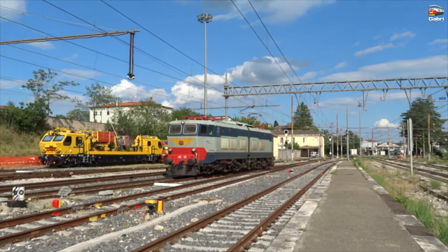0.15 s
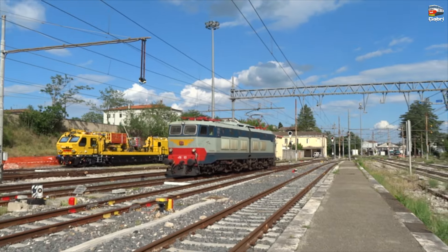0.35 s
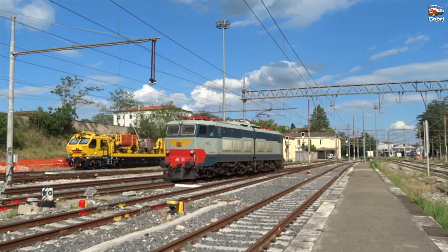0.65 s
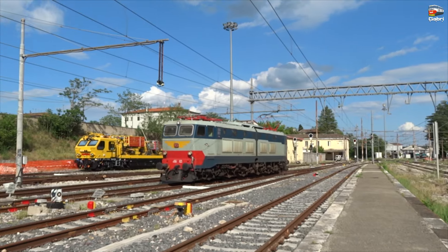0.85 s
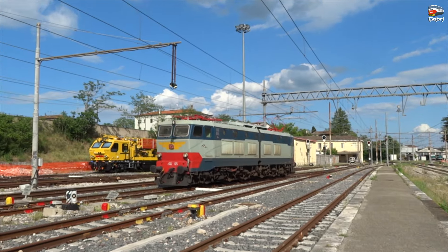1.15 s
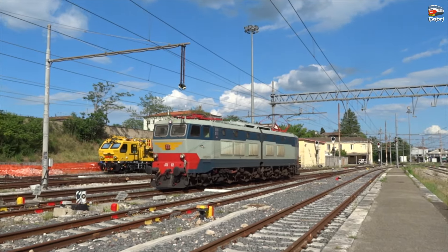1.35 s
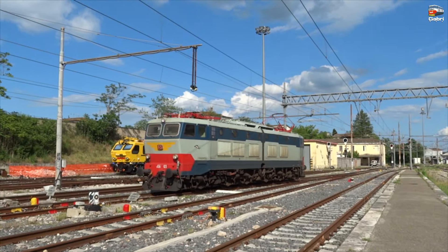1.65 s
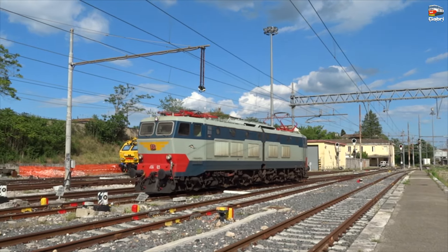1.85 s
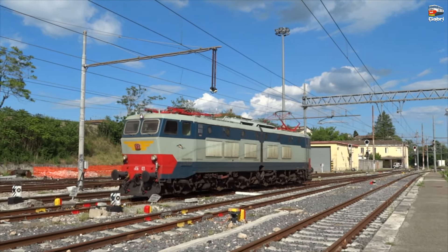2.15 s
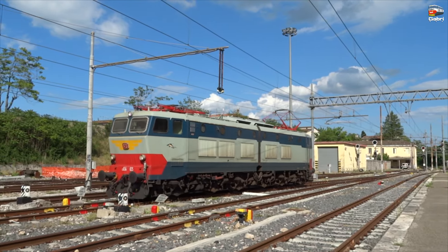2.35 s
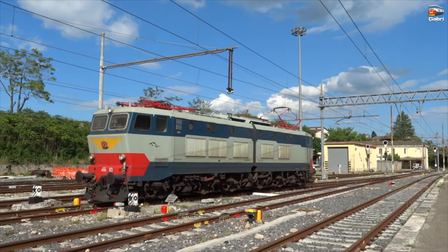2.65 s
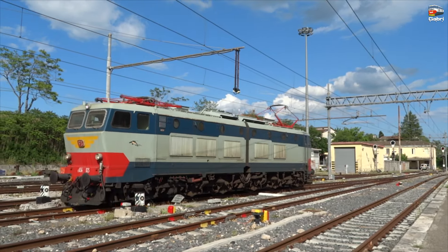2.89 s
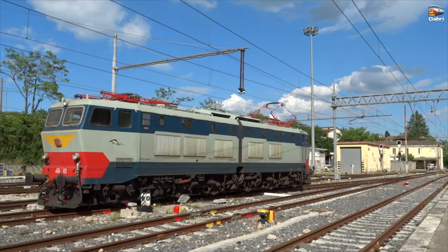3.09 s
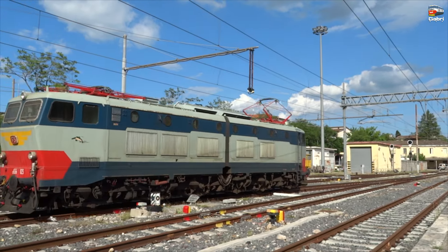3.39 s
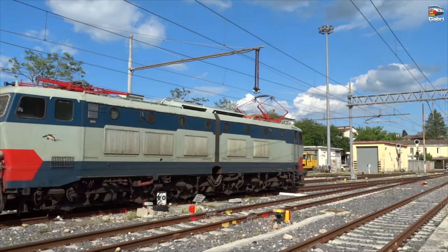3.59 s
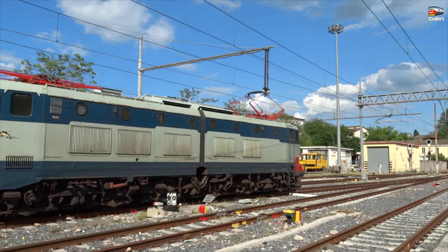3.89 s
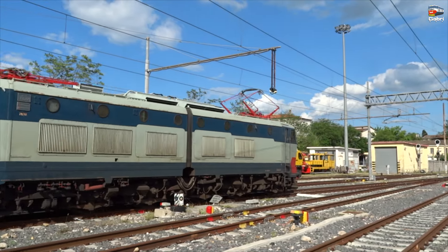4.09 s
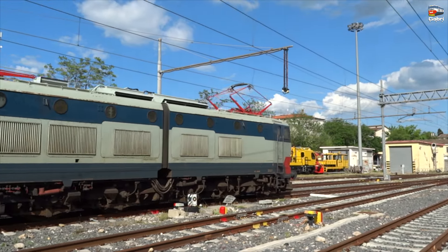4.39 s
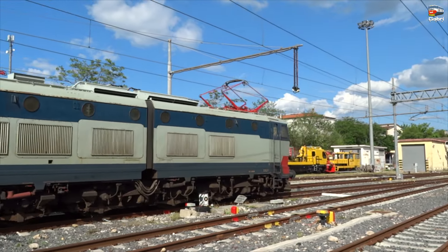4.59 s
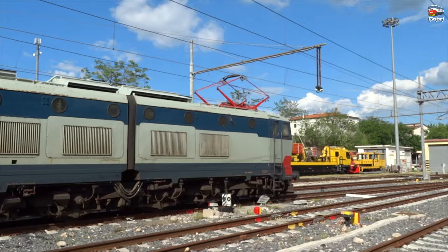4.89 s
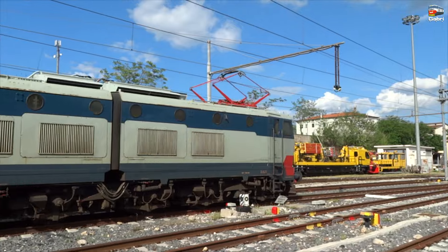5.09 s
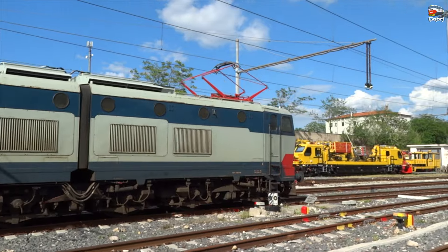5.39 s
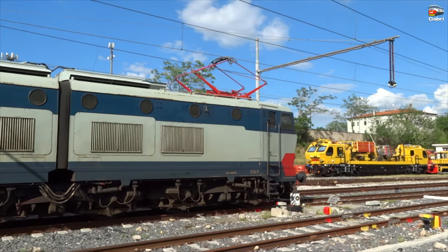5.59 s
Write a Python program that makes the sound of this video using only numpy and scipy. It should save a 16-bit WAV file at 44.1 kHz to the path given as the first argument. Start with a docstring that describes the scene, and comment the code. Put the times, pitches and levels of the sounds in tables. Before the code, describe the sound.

Dense, high metallic hiss and wavering squeals from a slow locomotive's wheels rubbing the rails, over soft rumble and irregular clacks.

```python
"""First comes a dense hiss with a few whistling notes, over a low rumble and drone.
An electric locomotive is rolling slowly through the curve of a track switch, beside a platform.
Its flanges (the lips on its wheels) rub the rail and make the steel wheels ring, squeak and chirp.
Rough rail causes the rumble, and the wheels knock over gaps. Twice the flanges briefly let go."""
import sys
import numpy as np
from scipy import signal
from scipy.fft import rfft, irfft, next_fast_len
from scipy.io import wavfile
from scipy.ndimage import uniform_filter1d, minimum_filter1d, map_coordinates

SR = 44100
rng = np.random.default_rng(int(sys.argv[2]) if len(sys.argv) > 2 else 0)


def log_audio(samples):
    """Write samples as a 16-bit WAV file to the path given in sys.argv[1]."""
    # one column per channel
    frames = np.atleast_2d(samples).T
    # limit to full scale, then quantise
    limited = np.clip(frames, -1, 1)
    pcm = np.round(limited * 32767).astype(np.int16)
    wavfile.write(sys.argv[1], SR, pcm)


N = 253134

# Short slips of the flange: time_s, length_s, change_db
FLANGE_SLIPS = [(0.172, 0.048, -3.5), (0.502, 0.025, -2), (1.45, .015, -0.5), (3.17, 0.017, -1.5),
                (3.382, 0.02, -3.5), (3.614, 0.013, -4.5), (4.272, 0.005, -12), (4.419, 0.0099, 2.5),
                (4.407, 0.0036, 0), (4.487, 0.0036, -3), (5.478, 0.018, -5)]
# How loud the rubbing is: time_s, level_db
HISS_LEVELS = [(0, -26), (.08, -22), (.3, -24), (.55, -22.5), (1.0, -21.5), (1.39, -20), (1.8, -20),
               (2.3, -21.5), (2.8, -20.5), (3.14, -20.5), (3.46, -18), (3.97, -17.5), (4.41, -18),
               (4.66, -19), (4.85, -19), (5.1, -20.5), (5.43, -21.5), (5.6, -17.5), (5.74, -21.5)]
# Colour and side of the hiss: time_s, high_part_db, low_part_db, left_over_right_db
HISS_TONE = [(0, -1, 6, 0), (.6, -2, 5, -0.5), (.8, 1.5, 4.5, 0), (1.5, -1.5, 2.5, -0.5),
             (2.3, -1, 3, -0.5), (3.1, 2, 2.5, 0), (3.3, -1.5, 0.5, 2), (3.7, -4.5, -4, 1.5),
             (4.05, -4, -4.5, 2), (4.3, -3.5, -1, 1), (4.8, 0.5, 1, 1), (5.2, -2.5, 2, 1.5),
             (5.74, 2.5, -1.5, 1.5)]
# Notes at which the far and the near wheels ring: pitch_hz, width_hz, level_db
FAR_WHEEL_NOTES = [(4370, 280, -11.5), (4850, 570, -5), (5350, 430, -5.5), (5786, 480, -3), (6580, 540, -2),
                   (7500, 1300, -3), (7900, 180, -1.5), (8440, 500, -2), (8650, 500, -22),
                   (9300, 1160, -9.5), (10490, 510, -10), (11380, 460, -14), (12250, 530, -16.5),
                   (13400, 460, -30), (14100, 800, -25), (14900, 1200, -35)]
NEAR_WHEEL_NOTES = [(4250, 500, -9), (5200, 700, -8), (5800, 600, -7), (6450, 550, -3.5), (7090, 400, -3),
                    (7790, 300, -4), (8400, 700, -5), (9150, 600, -11), (9800, 400, -12), (10450, 600, -16),
                    (11200, 600, -16), (11950, 600, -19), (12500, 500, -20), (13300, 800, -21),
                    (14300, 1000, -25), (15300, 1200, -28)]
# How much of the hiss comes from the near wheels: time_s, share_0_to_1
NEAR_SHARE = [(0, 0.34), (3.1, 0), (3.2, 0.46), (3.45, 0.4), (4.05, 0.75), (4.3, 0.65), (5.0, 0.56),
              (5.74, 0.95)]
# The four wheel notes that whistle: pitch_hz, width_hz
WHISTLE_NOTES = [(3262, 57), (4015, 160), (4745, 60), (9800, 75)]
# Loudness of the low pair of whistles, and of the high pair that sings late: time_s, lower_db, upper_db
LOW_WHISTLE_LEVELS = [(0, -30, -31.5), (.2, -34.5, -31.5), (.45, -28.5, -30), (.95, -26, -31),
                      (1.2, -30.5, -25.5), (1.55, -31.5, -29.5), (2.0, -29, -31.5), (2.7, -30.5, -31.5),
                      (3.05, -27, -30), (3.25, -42.5, -36), (3.65, -31.5, -36), (3.9, -30, -37.5),
                      (4.15, -26, -40), (4.3, -40, -33.5), (4.7, -43, -32.5), (4.9, -32, -29),
                      (5.4, -30, -30.5), (5.74, -31, -36.5)]
HIGH_WHISTLE_LEVELS = [(4.3, -60, -58), (4.42, -47, -46), (4.57, -52, -50), (4.62, -38, -50),
                       (4.7, -27.5, -49), (4.98, -26, -42), (5.08, -40, -36), (5.17, -31, -33),
                       (5.3, -40, -36), (5.45, -48, -34), (5.5, -36, -32), (5.6, -36, -50), (5.7, -31, -50),
                       (5.74, -38, -50)]
# A whistle flares up: time_s, pitch_hz, rise_db, length_s
WHISTLE_FLARES = [(0.054, 3262, 11, 0.038), (0.11, 4015, 5.5, .03), (.27, 3262, 7.5, 0.033),
                  (0.576, 3262, 7, 0.023), (.78, 3262, -1, 0.027), (.93, 3262, 2, .05),
                  (1.041, 3262, 9, 0.019), (1.15, 4015, 2, .015), (1.198, 4015, 2, .015),
                  (1.53, 3262, 8.5, 0.06), (1.86, 3262, 3.5, 0.033), (2.042, 3262, 3, 0.061),
                  (2.248, 3262, 6.5, 0.06), (2.603, 3262, 6.5, 0.023), (2.68, 3262, 6, .02),
                  (2.764, 3262, 7, .03), (2.87, 4015, 2, .04), (2.98, 3262, 7, .03),
                  (3.368, 3262, 14, 0.05), (3.683, 4015, 6, .02), (3.69, 3262, 2, 0.017),
                  (3.77, 3262, 5, .02), (3.86, 3262, 6, 0.045), (3.975, 4015, 7, .03),
                  (4.0, 3262, 5.5, 0.012), (4.25, 4015, 11, .025), (4.387, 3262, 10, .05),
                  (4.802, 3262, 8, .02), (4.843, 4015, 6.5, 0.026), (5.1, 3262, 3, .02),
                  (5.17, 3262, 7, .02), (5.19, 4015, 5, .04), (5.28, 3262, 5, 0.022),
                  (5.41, 3262, 8.5, 0.031), (5.464, 3262, 7.5, 0.013), (5.697, 4015, 8, .02)]
# Loudness of the rolling sounds: time_s, rumble_db, drone_db, rail_db, web_db, boom_db
ROLLING_LEVELS = [(0, -49.5, -41.5, -47, -31, -72), (.3, -52, -43, -45.5, -30, -74),
                  (.65, -47.5, -44, -46.5, -29.5, -63), (.75, -55, -38.5, -37.5, -26.5, -70),
                  (1.0, -49.5, -38, -41.5, -26, -68), (1.5, -49.5, -42, -41, -24.5, -66),
                  (2.0, -47.5, -36.5, -36, -26, -66), (2.45, -44.5, -32.5, -35.5, -26, -63),
                  (2.75, -44, -37.5, -36, -24.5, -58), (3.15, -46, -38, -35, -24.5, -69),
                  (3.3, -48.5, -46.5, -40, -27.5, -60), (3.55, -48.5, -43, -38, -27, -72),
                  (3.8, -44.5, -42, -43.5, -35.5, -72), (4.2, -44, -40, -38.5, -27.5, -69),
                  (4.45, -52.5, -44, -42, -28.5, -73), (4.9, -51, -40, -38.5, -25.5, -75),
                  (5.35, -49, -47, -42, -31.5, -73), (5.74, -52, -42, -40.5, -27, -79)]
# Shape of the ground's deep boom and of the rumble above it: pitch_hz, level_db
BOOM_SHAPE = [(15, -45), (25, -20), (40, -14), (86, 2), (140, -11), (180, -33), (310, -120)]
RUMBLE_SHAPE = [(82, -45), (140, -15.5), (242, 2), (404, -2.5), (453, -12), (497, 2), (544, -7),
                (600, -0.5), (780, -24), (1320, -120)]
# Notes of the drone, the rail and the web (a wheel's disc): pitch_hz, width_hz, level_db
DRONE_NOTES = [(650, 160, -13.5), (692, 135, -0.5), (815, 164, 1.5), (975, 220, -5.5)]
RAIL_NOTES = [(1122, 180, -4), (1267, 180, 3), (1420, 135, -1.5), (1673, 210, -1)]
WEB_NOTES = [(1938, 188, 0.5), (2092, 150, -1.5), (2262, 100, -1.5), (2342, 160, -1), (2517, 99, 2),
             (2703, 173, 0), (2896, 230, -3), (3170, 92, -12), (3410, 300, -1.5), (3820, 250, -6.5)]
# Lean to the left, which each sound scales by its own amount: time_s, rail_db, web_db
LEFT_LEAN = [(0.0, 2.5, -0.5), (0.65, 0.0, -1), (0.73, 4.5, 1), (1.17, -1, -1), (1.92, 3.5, 2.0),
             (4.0, 2, 4), (4.28, 0, -0.5), (4.36, 2, 4), (5.26, 2.5, 4), (5.74, -0.5, 3)]
# Wheels drop over rail gaps: start_s, ring_db, thud_db
GAP_KNOCKS = [(.092, -51, -52), (.60, -58, -48), (.70, -32, -52), (.862, -44, -59), (1.13, -40, -38.5),
              (1.722, -30, -44), (1.892, -25, -42), (1.96, -30.5, -42), (2.135, -30, -31.5),
              (2.312, -25, -32), (2.39, -26.5, -35), (2.484, -28, -46), (2.698, -24, -33),
              (2.847, -25.5, -37), (2.905, -22.5, -36), (3.015, -40, -49), (3.133, -27, -41),
              (3.177, -26, -46), (3.365, -31.5, -38), (3.613, -35, -46), (3.731, -32, -46),
              (3.876, -28, -32.5), (3.966, -32, -48), (4.06, -37, -36.5), (4.146, -37, -36),
              (4.241, -28.5, -49), (4.295, -37, -48), (4.781, -33, -42), (4.841, -39, -36),
              (4.899, -35, -58), (5.17, -42, -46), (5.26, -46, -53), (5.34, -32, -43), (5.47, -40, -41)]
# Notes of the sleepers, the beams under the rails: pitch_hz, width_hz, level_db
SLEEPER_NOTES = [(240, 71, 4), (400, 230, 3.5)]
# The flange bites the rail with a spit: start_s, strength_db
FLANGE_BITES = [(0.181, -25), (2.375, -15), (3.6361, -25), (4.127, -11), (4.155, -17), (4.1944, -14),
                (4.273, -12), (4.32, -18)]
# The flanges let go: start_s, grips_again_s, depth_db, fall_s
FLANGE_RELEASES = [(0.552, 0.692, -8.5, 0.016), (4.036, 4.12, -15, 0.062)]
# Brief chirps of single wheel notes: time_s, pitch_hz, peak_db, length_s
WHEEL_CHIRPS = [(1.28, 7870, -22, .03), (1.447, 6550, -21.5, .03), (1.785, 5420, -21, .015),
                (1.875, 5400, -23, .015), (1.985, 1960, -22, 0.018), (2.069, 1950, -20.5, 0.024),
                (2.575, 1930, -24, .012), (2.787, 1953, -22, .012), (2.875, 1874, -23, .012),
                (3.132, 1880, -24, .025), (3.2, 1870, -22, .012), (3.26, 6520, -22, 0.024),
                (3.295, 5200, -21.5, .015), (3.416, 2050, -23, 0.014), (3.487, 7100, -23, .03),
                (3.504, 1937, -23.5, 0.018), (3.543, 1725, -28, .01), (3.616, 7070, -26, 0.029),
                (3.655, 2030, -28, 0.011), (3.834, 6500, -25, .03), (3.97, 6530, -22, 0.024),
                (4.02, 8020, -14.5, 0.021), (4.226, 5811, -17, 0.0064), (4.331, 2000, -22.5, 0.0074),
                (4.38, 1790, -27, 0.0099), (4.505, 2410, -19.5, 0.0097), (4.705, 7100, -22, .025),
                (4.93, 7790, -24, .03), (5.11, 7900, -24, .04), (5.29, 6510, -26, .04),
                (5.603, 7050, -27, .03)]
# How far the left microphone is ahead of the right: pitch_hz, lead_radians
LEFT_LEAD = [(60, 0), (160, 0.022), (600, -0.33), (3000, -0.29), (9900, 0.081), (15200, -0.13)]
# How much louder the left microphone is: pitch_hz, left_over_right_db
MIC_BALANCE = [(100, 0), (700, 0.2), (1400, 1), (2000, 2.5), (2800, -1), (5000, 1.5), (7500, -0.5),
               (10000, 3.5), (13000, 0.5)]


def amp(db):
    """Turn decibels into a number to multiply by."""
    return 10 ** (np.asarray(db) / 20)


def unit(x):
    """Scale a sound to an average power of one."""
    return x / np.sqrt(np.mean(x ** 2) + 1e-20)


def placed(x, db, pan_db):
    """Set a sound's level, with the left side pan_db louder than the right."""
    return unit(x) * amp(db + np.array([pan_db, -pan_db]) / 2)


def at_pitch(points, hz):
    """Read between the rows of a pitch table, giving each octave equal room."""
    pitches, values = np.transpose(points)
    return np.interp(np.log(hz + 1), np.log(pitches + 1), values)


def curves(rows):
    """Turn each column after the time into one value per sample."""
    times, *columns = np.transpose(rows)
    return [np.interp(np.arange(N) / SR, times, column) for column in columns]


def wobble(rate):
    """A smooth curve through `rate` random points a second."""
    points = rng.standard_normal(int(N * rate / SR) + 4)
    return map_coordinates(points, [np.arange(N) * rate / SR])


def filtered(x, response):
    """Strengthen, weaken or delay each pitch in x as response(hz) says."""
    size = next_fast_len(N + SR // 2)
    return irfft(rfft(x, size) * response(np.fft.rfftfreq(size, 1 / SR)), size)[..., :N]


def ringing(notes, flip=1):
    """A filter that rings at these notes; a negative flip fills the dips between them."""
    return lambda f: sum(flip ** k * amp(db) * 1j * f * width / (hz * hz - f * f + 1j * f * width)
                         for k, (hz, width, db) in enumerate(notes))


def bands(notes):
    """A filter with a steep peak at each note and deep valleys between."""
    return lambda f: np.sqrt(sum(amp(2 * db) / (1 + (2 * (f - hz) / width) ** 2) ** 2
                                 for hz, width, db in notes))


def same_level(response):
    """Scale a filter so that noise keeps its level."""
    return lambda f: response(f) / np.sqrt(np.mean(np.abs(response(f)) ** 2))


def grit(apart_db, patchy_db):
    """Rubbing noise with random loud and soft patches, nearly alike left and right."""
    spectrum = signal.stft(rng.standard_normal((2, N + 512)), nperseg=512)[2]
    patches = uniform_filter1d(rng.standard_normal(spectrum.shape[1:]), size=3, axis=0)
    patches = uniform_filter1d(patches, size=12, axis=1)
    mid, side = signal.istft(spectrum * amp(patchy_db * unit(patches)), nperseg=512)[1][:, :N]
    return np.array([mid + amp(apart_db) * side, mid - amp(apart_db) * side])


def flange_grip():
    """How hard the flange presses, in dB: it flutters and slips."""
    t = np.arange(N) / SR
    db = .5 * wobble(9) + 0.12 * wobble(24.63) + 0.49 * wobble(90)
    for time_s, length_s, change_db in FLANGE_SLIPS:
        db += change_db * np.exp(-((t - time_s) / length_s) ** 2)
    return db


def flange_hiss(grip_db):
    """Rubbing hisses and rings the wheels: mostly the far ones at first, later the near ones."""
    hiss_db, = curves(HISS_LEVELS)
    near, = curves(NEAR_SHARE)
    high_db, low_db, pan_db = curves(HISS_TONE)
    far_ring = unit(filtered(grit(-21, patchy_db=2.2), bands(FAR_WHEEL_NOTES)))
    near_ring = unit(filtered(grit(-19, patchy_db=4.0), bands(NEAR_WHEEL_NOTES)))
    rub = np.sqrt(1 - near) * far_ring + np.sqrt(near) * near_ring
    high = filtered(rub, lambda hz: 1 / (1 + (9600 / (hz + 1)) ** 12))
    low = filtered(rub, lambda hz: 1 / (1 + (hz / 6100) ** 12))
    middle = rub - high - low
    # the highest part sizzles when the wheels are near, and always flutters a little
    high_db += near * (0.42 * wobble(9) + 1.9 * wobble(35))
    high_db += 0.18 * grip_db + 0.69 * wobble(12)
    hiss = low * amp(low_db) + middle + high * amp(high_db)
    return placed(hiss, hiss_db + grip_db + letting_go(), pan_db)


def whistles(grip_db, flicker_db=1.2):
    """A few wheel notes ring freely: each is a wavering tone inside a narrow band of noise."""
    t = np.arange(N) / SR
    pan_db = 0.72 * curves(LEFT_LEAN)[1]
    contact_db = 0.3 * grip_db + 0.84 * letting_go()
    mid, side = rng.standard_normal((2, N))
    rub = np.array([mid + amp(-21) * side, mid - amp(-22) * side])
    levels = curves(LOW_WHISTLE_LEVELS) + curves(HIGH_WHISTLE_LEVELS)
    out = 0
    for (hz, width), db in zip(WHISTLE_NOTES, levels):
        band = ringing([(hz, width, 0)])
        ring = unit(filtered(rub, lambda f: band(f) / (1 + ((f - hz) / 260) ** 2)))
        pitch_hz = hz + .25 * width * wobble(45)
        tone = np.sin(2 * np.pi * np.cumsum(pitch_hz) / SR)
        flare_db = sum(rise_db * np.exp(-((t - time_s) / length_s) ** 2)
                       for time_s, flare_hz, rise_db, length_s in WHISTLE_FLARES if flare_hz == hz)
        level_db = db + flare_db + flicker_db * wobble(32) + contact_db
        out = out + placed(ring + 0.81 * tone, level_db, pan_db)
    return out


def rolling(grip_db):
    """Rough rail shakes the ground, the sleepers, the rail itself and the wheel discs."""
    rumble_db, drone_db, rail_db, web_db, boom_db = curves(ROLLING_LEVELS)
    rail_pan_db, web_pan_db = curves(LEFT_LEAN)
    rough_db = 1.5 * wobble(11)  # the rail is rougher in places
    boom = filtered(grit(-32, patchy_db=1.5), lambda hz: amp(at_pitch(BOOM_SHAPE, hz)))
    rumble = filtered(grit(-24.5, patchy_db=2), lambda hz: amp(at_pitch(RUMBLE_SHAPE, hz)))
    drone = filtered(grit(-20, patchy_db=2.5), bands(DRONE_NOTES))
    rail = filtered(grit(-15, patchy_db=2.5), bands(RAIL_NOTES))
    web = filtered(grit(-27, patchy_db=2.5), bands(WEB_NOTES))
    return (unit(boom) * amp(boom_db + 1.5 * wobble(8))
            + placed(rumble, rumble_db + rough_db, .1 * rail_pan_db)
            + placed(drone, drone_db + 0.94 * rough_db, 0.27 * rail_pan_db)
            + placed(rail, rail_db + 0.79 * rough_db, 1.07 * rail_pan_db)
            + placed(web, web_db + 0.84 * letting_go() + 1.1 * grip_db + 0.45 * wobble(16), web_pan_db))


def squeaks(count=700, samples=1536):
    """Tiny sliding squeaks at random pitches, more crowded late on, when the near wheels rub."""
    when, pitch, spread, size, life, glide = rng.random((count, 6)).T[..., None]
    start = (N * (1 - when ** 2.2 * .99)).astype(int) - 1
    t = np.arange(samples) / SR
    length_s = 0.013 + 0.012 * life
    swell = np.sin(np.pi * np.clip(t / length_s, 0, 1)) ** 2
    pitch_hz = 5200 + 1900 * (pitch + spread)
    cycles = pitch_hz * t + 5000 * (glide - .5) * t ** 2
    tones = amp(-10.5 + 7.4 * size) * swell * np.sin(2 * np.pi * cycles)
    # add each squeak in at its own start
    out = np.bincount((start + np.arange(samples)).ravel(), tones.ravel(), N + samples)[:N]
    return out * amp(curves(HISS_LEVELS)[0] + letting_go() + np.array([[.6], [-.6]]))


def knocks(rise_s=0.0013, fade_s=0.19):
    """A wheel drops over a gap: a dull thud in the sleepers and a brief ring of the rail."""
    blows, thuds = np.zeros((2, N + SR))
    t = np.arange(SR // 4) / SR
    for start_s, ring_db, thud_db in GAP_KNOCKS:
        puff = rng.standard_normal((2, len(t))) * (1 - np.exp(-t / rise_s)) * amp(-60 * t / fade_s)
        blows[round(start_s * SR):][:len(t)] += amp(ring_db) * puff[0]
        thuds[round(start_s * SR):][:len(t)] += amp(thud_db) * puff[1]
    ring = filtered(blows[:N], same_level(ringing(DRONE_NOTES + RAIL_NOTES, flip=-0.77)))
    sleepers = ringing(SLEEPER_NOTES, flip=-1)
    thud = filtered(thuds[:N], same_level(lambda f: sleepers(f) * (1j * f / (140 + 1j * f)) ** 2))
    return ring * amp(.3 * curves(LEFT_LEAN)[0] * [[1], [-1]]) + thud


def bites(spit_s=.008, tail_s=0.11):
    """Each fresh bite of the flange is a short burst of noise that rings the wheels."""
    bursts = np.zeros(N + SR)
    t = np.arange(SR // 8) / SR
    fade = amp(-60 * t / spit_s) + .5 * amp(-60 * t / tail_s)
    for start_s, db in FLANGE_BITES:
        bursts[round(start_s * SR):][:len(t)] += amp(db) * fade * rng.standard_normal(len(t))
    return filtered(bursts[:N], ringing([(8050, 900, 5), (13500, 2500, -18)], flip=-0.88))


def letting_go(snap_share=0.47, settle_s=0.073):
    """The dip in dB as the flange lifts off. When it grips again, part snaps back, the rest creeps."""
    t = np.arange(N) / SR
    db = np.zeros(N)
    for start_s, grips_again_s, depth_db, fall_s in FLANGE_RELEASES:
        lifting = 1 - np.exp(-np.clip(t - start_s, 0, 1) / fall_s)
        settling = (1 - snap_share) * np.exp(-np.abs(t - grips_again_s) / settle_s)
        db += depth_db * np.where(t < grips_again_s, lifting, settling)
    return db


def chirps():
    """One wheel note is caught for a moment, swells and fades."""
    t = np.arange(N) / SR
    return sum(amp(db) * np.exp(-((t - time_s) / length_s) ** 2) * np.sin(2 * np.pi * hz * t)
               for time_s, hz, db, length_s in WHEEL_CHIRPS)


def scene():
    """Add up all the sounds; one grip sways the hiss, whistles and wheel discs together."""
    grip_db = flange_grip()
    rubbing = flange_hiss(grip_db) + bites() + chirps() + squeaks() + whistles(grip_db)
    return rubbing + rolling(grip_db) + knocks()


def record(dry, bass_hz=35, peak_limit=.55, top_hz=15700):
    """Two close, unevenly matched microphones; peaks are held down, deepest bass and top treble cut."""
    def microphones(hz):
        """Thin the bass and set the two sides slightly apart in timing and level."""
        mismatch = .5j * at_pitch(LEFT_LEAD, hz) + np.log(amp(at_pitch(MIC_BALANCE, hz) / 2))
        return hz ** 2 / (hz ** 2 + bass_hz ** 2) * np.exp(mismatch * np.array([[1], [-1]]))

    heard = filtered(dry, microphones)
    gain = np.minimum(1, peak_limit / (np.abs(heard).max(axis=0) + 1e-9))
    heard *= uniform_filter1d(minimum_filter1d(gain, size=161), size=121)
    return filtered(heard, lambda hz: amp(-60 * np.clip((hz - top_hz) / 200, 0, 2)))


dry = scene()
out = record(dry)
log_audio(out)
```